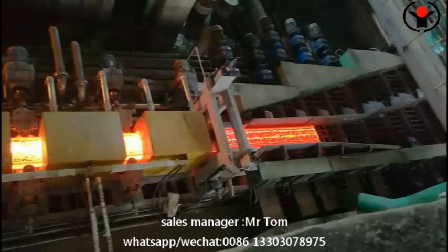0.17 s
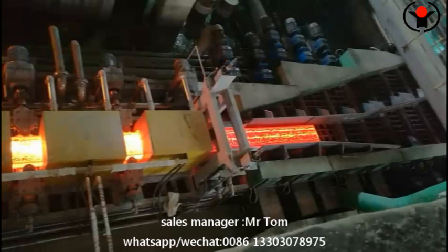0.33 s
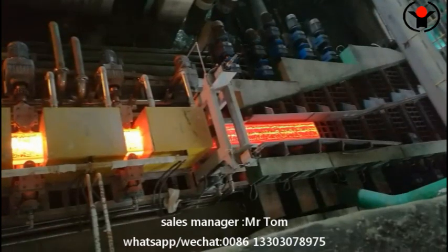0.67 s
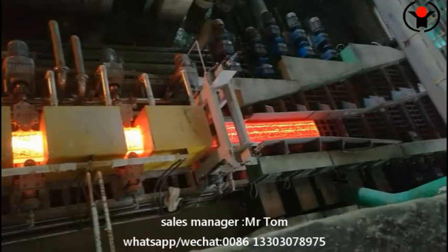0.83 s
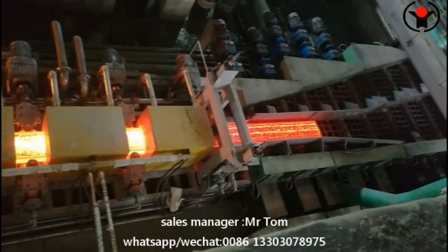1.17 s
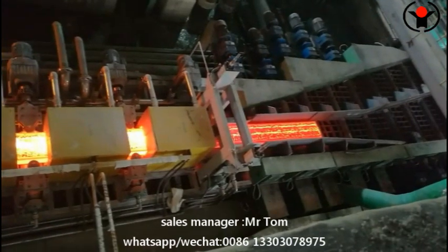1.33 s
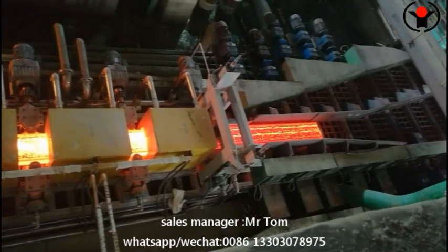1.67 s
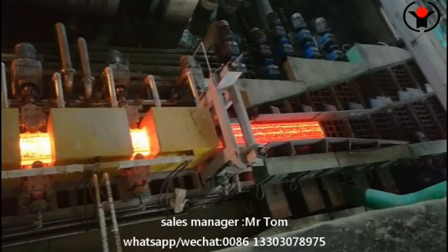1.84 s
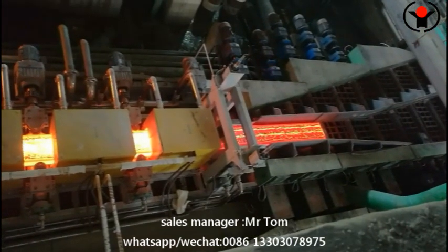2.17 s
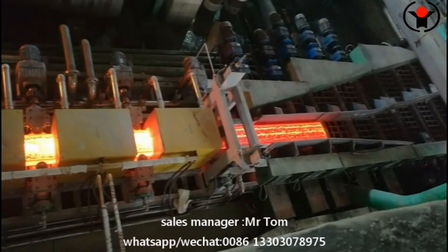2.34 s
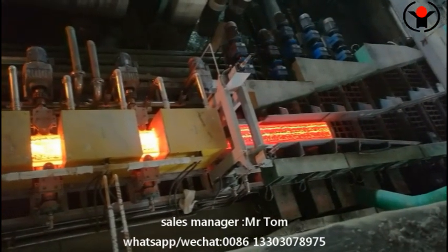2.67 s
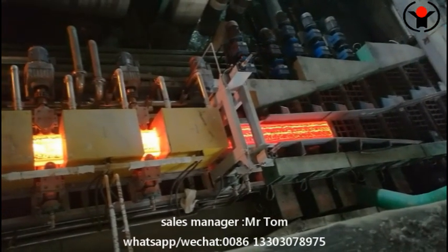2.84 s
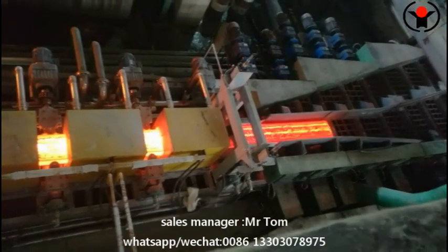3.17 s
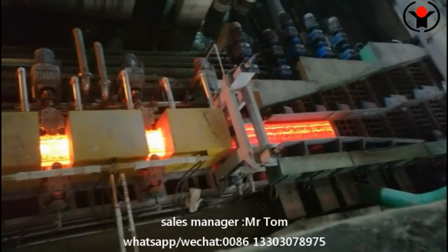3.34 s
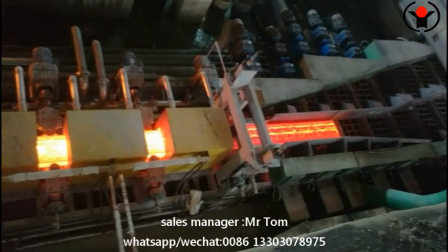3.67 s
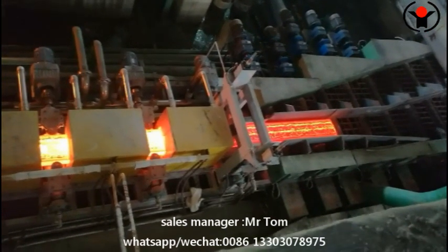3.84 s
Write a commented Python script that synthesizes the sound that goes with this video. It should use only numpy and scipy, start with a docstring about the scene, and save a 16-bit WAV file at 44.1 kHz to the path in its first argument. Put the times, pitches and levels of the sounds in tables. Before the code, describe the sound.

Loud buzzing whine from induction coils heating steel bars, close pitches wavering against each other, the strongest creeping slightly upward; behind it steady machine and water rush, droning pumps, electrical hum. Mono, reverberant factory hall.

```python
"""An induction heating line in a factory hall, taken with one microphone; silence for the first third of a second.
Then the hall switches in abruptly: a broad machine rush, its treble strongest at first, droning pumps, rectifier hum.
Over it three coils sing, each a stack of sine partials at multiples of its converter's working frequency.
Standing waves make the partials swell and fade; the loudest coil creeps up in pitch to the end as the steel heats.
"""
import sys
import numpy as np
from scipy import signal
from scipy.io import wavfile
from scipy.ndimage import uniform_filter1d, minimum_filter1d

SR = 44100
rng = np.random.default_rng(int(sys.argv[2]) if len(sys.argv) > 2 else 0)


def transcribe(u):
    """Save the signal u as a 16-bit wav file named by the first command-line argument.

    u: samples, shape (n,) or (channels, n), limited to [-1, 1]; the rate is SR.
    q: integer samples, one column per channel.
    """
    v = np.clip(np.atleast_2d(u).T, -1, 1)
    q = np.round(v * 32767).astype(np.int16)
    wavfile.write(sys.argv[1], SR, q)


N = 176400  # four seconds

# Rush of machines and cooling water, spectrum before its swells: pitch_hz, relative level_db (per Hz)
RUSH_SPECTRUM = [(25, -25), (40, -17.5), (62, -15), (85, -5.5), (125, 1.5), (170, 0), (270, 2.5),
                 (350, -3.5), (430, -10.5), (520, -13.5), (700, -2.5), (850, -12), (1350, -8.5),
                 (1700, -9.5), (2200, -3.5), (2600, -12.5), (3000, -17.5), (3500, -25), (4100, -29.5),
                 (4700, -31.5), (5800, -33), (6600, -33), (7600, -56.5), (8500, -59), (10500, -53),
                 (13500, -57)]
# Swell of the rush's treble: start_s, relative level_db
HISS_LEVEL = [(.35, 4.5), (.5, 2), (.8, 0.5), (1.1, -0.5), (1.35, -0.1), (1.7, 1.5), (1.97, 0.9),
              (2.15, -0.7), (2.33, 0.5), (2.52, 1.7), (3.05, -1.2), (3.65, 0.2), (4, -.5)]
# Swell of the rush's bass and of the drones: start_s, relative level_db
RUMBLE_LEVEL = [(.35, 1.5), (.7, 1), (1.0, -1.5), (1.2, -1), (1.5, 0.5), (1.8, -0.5), (1.9, -2), (2.2, 1),
                (2.32, -3.5), (2.45, 2), (2.8, -2), (3.2, -2.5), (3.55, -0.5), (4, -1.5)]
# Resonances of pumps and frames: pitch_hz, width_hz, level_db (rms, before the bass swell)
DRONES = [(99, 5.8, -48.5), (142, 8, -31), (197.5, 6.2, -35), (448, 8, -46), (619.4, 6, -39), (900, 4, -47),
          (952, 18, -40.5), (1047, 2.6, -44), (2090, 6, -51.5), (2630, 11, -51.5)]
# Six-pulse rectifier hum: start_s, level_db (rms)
RECTIFIER_LEVEL = [(0.36, -19.5), (0.49, -18.5), (0.87, -21), (2.48, -18), (3.1, -23.5), (3.12, -21.5),
                   (3.93, -20.5), (3.98, -23)]

# Prominent partials of the low coil in the standing waves: start_s, level_db (rms)
LOW_FIRST = [(0.36, -25), (1.27, -27), (1.46, -39.5), (1.68, -26.5), (1.99, -37.5), (2.22, -31.5),
             (3.24, -30), (3.69, -22), (3.98, -26)]
LOW_SECOND = [(0.36, -28.5), (0.51, -27.5), (0.63, -31), (2.45, -28), (3.31, -31), (3.87, -25),
              (3.98, -28.5)]
LOW_THIRD = [(0.36, -24.5), (1.03, -27.5), (2.0, -25), (2.11, -28.5), (3.71, -25), (3.98, -29.5)]
# Prominent partials of the middle coil: start_s, level_db (rms)
MIDDLE_FIRST = [(0.36, -17), (0.67, -21), (0.89, -16.5), (1.7, -19.5), (1.87, -27), (2.24, -18.5),
                (2.68, -23), (2.74, -25.5), (3.06, -21.5), (3.27, -23.5), (3.78, -16.5), (3.98, -18)]
MIDDLE_SECOND = [(0.36, -39.5), (2.14, -32), (2.19, -27.5), (3.04, -36), (3.86, -29.5), (3.98, -33)]
MIDDLE_THIRD = [(0.36, -37), (0.62, -29.5), (2.6, -31), (2.71, -44), (2.9, -38.5), (3.95, -40.5),
                (3.98, -44)]
# Working frequency of the loudest coil: start_s, pitch_hz
MAIN_PITCH = [(.36, 738.8), (.9, 739.6), (1.5, 741.2), (2.1, 742.7), (2.6, 744.6), (3.1, 745.4),
              (3.6, 746.9), (4, 747.8)]
# Prominent partials of the loudest coil: start_s, level_db (rms)
MAIN_FIRST = [(0.36, -12), (0.42, -19), (0.56, -12.5), (0.83, -14), (0.94, -11), (1.25, -11.5), (1.5, -15),
              (1.74, -12), (1.93, -14), (2.05, -11.5), (2.42, -14), (2.51, -19), (2.6, -13.5), (2.82, -11),
              (3.37, -11), (3.57, -15), (3.85, -14.5), (3.98, -11.5)]
MAIN_SECOND = [(0.36, -25), (0.43, -32), (1.24, -29), (1.33, -40), (1.42, -32), (1.98, -26), (2.34, -36.5),
               (2.7, -34), (2.76, -28), (3.16, -23.5), (3.32, -26), (3.98, -27)]
MAIN_THIRD = [(0.36, -34), (0.44, -24), (0.71, -33), (0.88, -22), (1.07, -36.5), (1.59, -25), (1.99, -27),
              (2.04, -34), (2.36, -37.5), (2.53, -21.5), (3.05, -28), (3.69, -24.5), (3.78, -29.5),
              (3.98, -27.5)]
MAIN_FOURTH = [(0.36, -29.5), (0.55, -38), (0.85, -33), (1.07, -51.5), (2.06, -33.5), (2.16, -59),
               (2.9, -42), (2.97, -34), (3.53, -45.5), (3.98, -34)]
MAIN_FIFTH = [(0.36, -42), (0.85, -43.5), (1.07, -57), (1.9, -52.5), (1.92, -43), (2.53, -47.5),
              (3.67, -46), (3.98, -46)]
MAIN_SIXTH = [(0.36, -52), (0.52, -59.5), (1.84, -47.5), (1.94, -44), (2.13, -53.5), (2.81, -44.5),
              (3.18, -59.5), (3.36, -57.5), (3.98, -52)]
MAIN_TENTH = [(.36, -63), (1.1, -67.5), (1.42, -65), (1.55, -56), (1.9, -65), (2.2, -65), (2.5, -50.5),
              (2.81, -66), (3.2, -56), (3.35, -65), (4, -62)]
MAIN_FIFTEENTH = [(.36, -79), (.65, -75), (.85, -66), (1.2, -68), (1.4, -80), (4, -80)]
# The coils' other partials: multiple, level_db (rms, before the random swell)
LOW_OVERTONES = [(4, -35), (5, -40), (6, -49.5), (7, -59.5), (8, -60.5), (9, -59), (10, -63), (12, -67.5),
                 (14, -85)]
MIDDLE_OVERTONES = [(4, -36.5), (5, -42), (6, -53.5), (7, -55), (8, -56), (9, -63), (11, -68), (12, -70),
                    (14, -78)]
MAIN_OVERTONES = [(7, -60), (8, -61.5), (9, -64.5), (11, -73), (12, -74.5), (13, -73), (14, -75.5),
                  (16, -81)]

RUSH_DB, HISS_FROM_HZ = -21, 800      # rms of the whole rush; where its treble begins
PATCHY_DB, PATCHY_PER_S = 1.5, 7.3    # flicker of each band of the rush: spread, rate
RECTIFIER_HZ = 299.8
LOW_HZ, MIDDLE_HZ = 608.7, 646.0      # working frequencies of the two steady coils
FADING_DB, FADING_PER_S = 4, 0.84     # random swell of the lesser partials: spread, rate
PHASE_WANDER, WANDER_PER_S = 0.14, 3  # spread in radians at the fundamental, rate
START_S, FADE_S = 0.333, 0.003
CEILING, LIMITER_S = 0.93, 0.006      # peak amplitude, window of the limiter
CUTOFF_HZ = 13900


def from_db(db):
    """Turns decibels into an amplitude factor."""
    return 10 ** (np.asarray(db) / 20)


def rms_one(x):
    """Scales a signal to an rms of 1."""
    return x / np.sqrt(np.mean(x ** 2) + 1e-20)


def in_time(rows):
    """Joins (start_s, value) rows by straight lines."""
    return np.interp(np.arange(N) / SR, *np.transpose(rows))


def on_log_axis(points, where):
    """Reads a table on a logarithmic axis, filling gaps between its rows."""
    places, values = np.transpose(points)
    return np.interp(np.log(where), np.log(places), values)


def drift(rate):
    """Slow random wandering of spread 1: noise through two equal low-pass poles at rate (Hz)."""
    step = 100  # samples between slow values
    warmup = 2000  # slow values dropped while the filter settles
    r = np.exp(-2 * np.pi * rate * step / SR)
    noise = rng.standard_normal(N // step + 2 + warmup)
    slow = signal.lfilter([1], [1, -2 * r, r * r], noise)[warmup:]
    slow = rms_one(slow - slow.mean())
    return np.interp(np.arange(N) / step, np.arange(len(slow)), slow)


def rush():
    """Machines and cooling water: third-octave noise bands, each flickering; bass and treble swell separately."""
    edges = 22 * 2 ** (np.arange(30) / 3)
    white = rng.standard_normal((2, N))  # neighbouring bands take different noises
    hiss_db, rumble_db = in_time(HISS_LEVEL), in_time(RUMBLE_LEVEL)
    out = 0
    for k, (low, high) in enumerate(zip(edges, edges[1:])):
        bandpass = signal.butter(2, [low, high], "band", fs=SR, output="sos")
        band = signal.sosfilt(bandpass, white[k % 2])
        centre_hz = np.sqrt(low * high)
        swell_db = hiss_db if centre_hz > HISS_FROM_HZ else rumble_db
        flicker_db = PATCHY_DB * drift(PATCHY_PER_S)
        out = out + band * from_db(on_log_axis(RUSH_SPECTRUM, centre_hz) + flicker_db + swell_db)
    return from_db(RUSH_DB) * rms_one(out)


def drones():
    """Pumps and frames ring in narrow resonances shaken by noise, swelling with the bass of the rush."""
    warmup = SR // 2
    out = 0
    for hz, width_hz, level_db in DRONES:
        r = np.exp(-2 * np.pi * width_hz / SR)
        section = [1 - r, 0, r - 1, 1, -2 * r * np.cos(2 * np.pi * hz / SR), r * r]
        shaking = rng.standard_normal(N + warmup)
        ringing = signal.sosfilt([section, section], shaking)[warmup:]
        out = out + from_db(level_db) * rms_one(ringing)
    return from_db(in_time(RUMBLE_LEVEL)) * out


def partial(hz, multiple, level_db):
    """A sine at one multiple of a frequency; the hall makes its phase wander, more at higher multiples."""
    turns = np.cumsum(hz * np.ones(N)) / SR
    wander = PHASE_WANDER * np.sqrt(multiple) * drift(WANDER_PER_S)
    phase = 2 * np.pi * (multiple * turns + rng.random()) + wander
    return np.sqrt(2) * from_db(level_db) * np.sin(phase)  # root 2: level is rms


def rectifiers():
    """Six-pulse rectifiers hum as one sine at their pulse rate."""
    return partial(RECTIFIER_HZ, 1, in_time(RECTIFIER_LEVEL))


def coil(hz, level_curves, overtones, count):
    """A coil sings its converter's multiples: prominent ones follow level curves, others swell at random."""
    out = 0
    for multiple in range(1, count + 1):
        if multiple in level_curves:
            level_db = in_time(level_curves[multiple])
        else:
            level_db = on_log_axis(overtones, multiple) + FADING_DB * drift(FADING_PER_S)
        out = out + partial(hz, multiple, level_db)
    return out


def low_coil():
    """The lowest coil holds a steady working frequency."""
    return coil(LOW_HZ, {1: LOW_FIRST, 2: LOW_SECOND, 3: LOW_THIRD}, LOW_OVERTONES, count=14)


def middle_coil():
    """The middle coil holds a steady working frequency."""
    prominent = {1: MIDDLE_FIRST, 2: MIDDLE_SECOND, 3: MIDDLE_THIRD}
    return coil(MIDDLE_HZ, prominent, MIDDLE_OVERTONES, count=14)


def main_coil():
    """The loudest coil's working frequency, and every partial with it, creeps up as the steel heats."""
    prominent = {1: MAIN_FIRST, 2: MAIN_SECOND, 3: MAIN_THIRD, 4: MAIN_FOURTH,
                 5: MAIN_FIFTH, 6: MAIN_SIXTH, 10: MAIN_TENTH, 15: MAIN_FIFTEENTH}
    return coil(in_time(MAIN_PITCH), prominent, MAIN_OVERTONES, count=16)


def scene():
    """The noise of the hall, the rectifiers and the three coils, summed to one channel."""
    background = rush() + drones() + rectifiers()
    coils = low_coil() + middle_coil() + main_coil()
    return (background + coils)[None]


def record(dry):
    """The sound switches in abruptly and ends without a click; a limiter holds the peaks; the top is cut."""
    t = np.arange(N) / SR
    from_edge_s = np.minimum(t - START_S, t[-1] - t)
    opened = np.sin(np.pi / 2 * np.clip(from_edge_s / FADE_S, 0, 1)) ** 2
    size = int(LIMITER_S * SR)
    needed = CEILING / np.maximum(np.abs(dry), CEILING)
    gain = uniform_filter1d(minimum_filter1d(needed, size), size)  # smoothed lowest gain nearby
    lowpass = signal.ellip(12, 0.1, 80, CUTOFF_HZ, fs=SR, output="sos")
    return signal.sosfilt(lowpass, dry * gain * opened)


dry = scene()
out = record(dry)
transcribe(out)
```